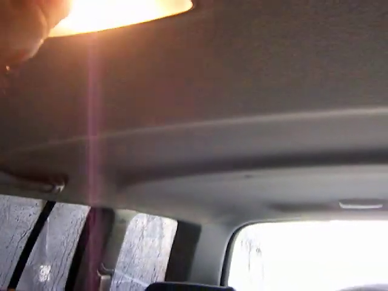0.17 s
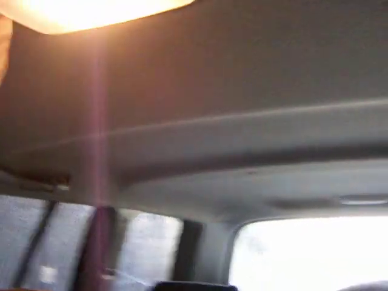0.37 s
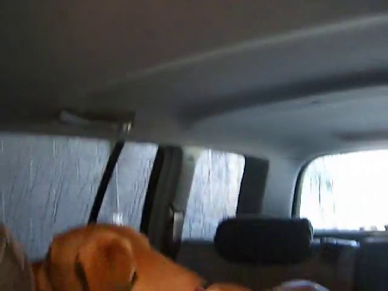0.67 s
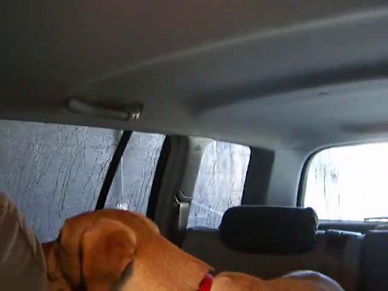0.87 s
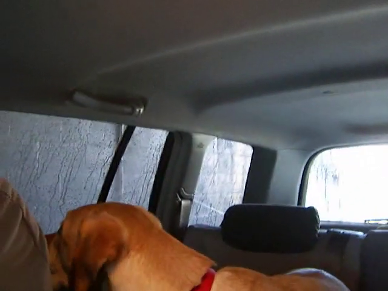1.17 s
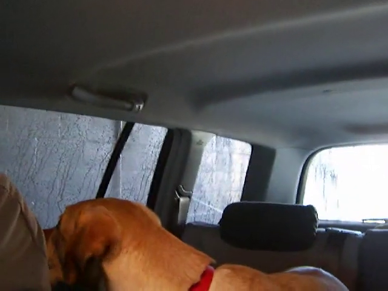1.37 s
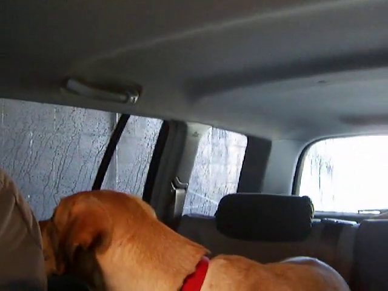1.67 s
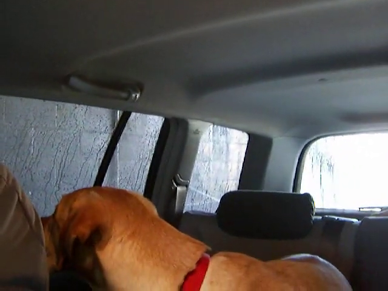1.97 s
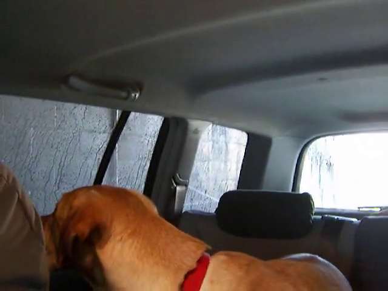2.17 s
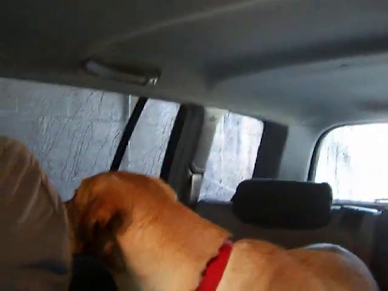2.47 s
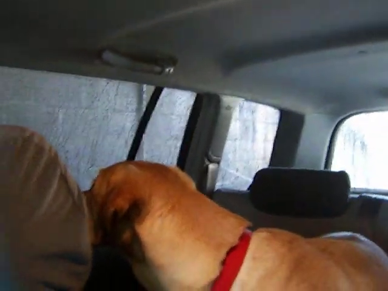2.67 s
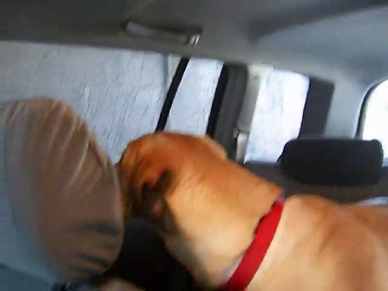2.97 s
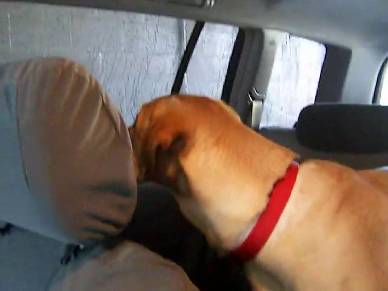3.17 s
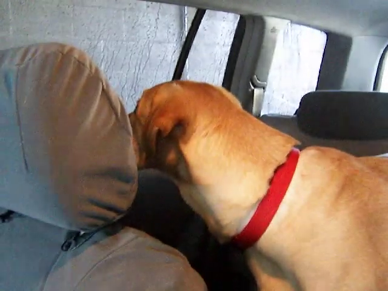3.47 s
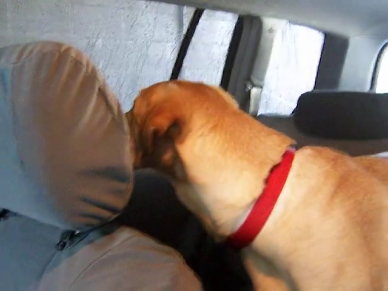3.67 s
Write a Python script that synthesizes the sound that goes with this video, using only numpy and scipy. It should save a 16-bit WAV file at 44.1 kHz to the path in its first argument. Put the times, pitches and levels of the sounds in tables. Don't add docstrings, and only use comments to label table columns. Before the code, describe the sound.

A car wash heard inside a parked car: deep, uneven pump boom near 40 Hz and dull water roar throughout. Plastic taps and creaks begin at once, and a loud lamp switch snap lands at 0.12 s with a brief dry ring. Faint water swells around 1.1 s and, weaker, 3.4 s. A tiny tick at 2.17 s precedes a rising, wavering motor hum with fuzzy whirr. Thin hiss and whine persist.

```python
import sys
import numpy as np
from scipy import signal
from scipy.fft import rfft, irfft
from scipy.io import wavfile
from scipy.ndimage import uniform_filter1d

SR = 44100
rng = np.random.default_rng(int(sys.argv[2]) if len(sys.argv) > 2 else 0)


def materialize(psi):
    bounded = np.clip(np.atleast_2d(psi).T, -1, 1)
    quanta = np.round(bounded * 32767).astype(np.int16)
    wavfile.write(sys.argv[1], SR, quanta)


def voltage_ratio(level):
    return 10 ** (np.asarray(level, float) / 20)


N = 168903
T = np.arange(N) / SR


def evened(x):
    return x / np.sqrt(np.mean(x ** 2) + 1e-20)


def curve(points, axis=1):
    p = np.array(points, float)
    return np.interp(T, p[:, 0], p[:, axis])


def slow(rate_hz):
    z = rfft(rng.standard_normal(4096))
    x = irfft(z * np.exp(-(np.arange(len(z)) / T[-1] / rate_hz) ** 2))
    return evened(np.interp(T, np.linspace(0, T[-1], len(x)), x))


def noise(points, patchy_db, flicker_db, size=2048):
    hop = size // 4
    frames, hz = N // hop + 5, np.fft.rfftfreq(size, 1 / SR)
    real, imag, patches = rng.standard_normal((frames, len(hz), 3)).T
    patches = uniform_filter1d(patches, size=size // 100, axis=0)
    patches = evened(uniform_filter1d(patches, size=8, axis=1))
    flicker = evened(uniform_filter1d(rng.standard_normal(frames), size=4))
    f, db = np.transpose(points)
    colour_db = np.interp(np.log(hz + 1), np.log(f + 1), db, right=-90)[:, None]
    z = (real + 1j * imag) * voltage_ratio(colour_db + patchy_db * patches + flicker_db * flicker)
    return evened(signal.istft(z, nperseg=size, noverlap=size - hop)[1][:N])


def tone(hz, width_hz, waver_db, rate_hz=5):
    turns = np.cumsum(hz + width_hz * slow(rate_hz)) / SR + rng.random()
    return np.sqrt(2) * np.sin(2 * np.pi * turns) * voltage_ratio(waver_db * slow(rate_hz))


def ring(modes, rise_s, damp=1):
    t = T[:9000]
    x = np.zeros(len(t))
    for hz, db, t60 in modes:
        x += voltage_ratio(db - 60 * t / (t60 * damp)) * np.sin(2 * np.pi * (hz * t + rng.random()))
    x = x * (1 - np.exp(-t / rise_s))
    return x / abs(x).max()


def crack(hz, width_hz, t60):
    t = T[:900]
    edges = [max(hz - width_hz / 2, 100), min(hz + width_hz / 2, 12000)]
    band = signal.butter(2, edges, "band", fs=SR, output="sos")
    x = signal.sosfilt(band, rng.standard_normal(len(t)) * voltage_ratio(-60 * t / t60))
    return x / abs(x).max()


def add(mix, s, sound):
    part = mix[round(s * SR):][:len(sound)]
    part += sound[:len(part)]


def bursts(rows):
    x = np.zeros(N)
    for s, db, length, hz in rows:
        t = np.arange(0, length, 1 / SR)
        swell = np.sin(np.pi * t / length) ** 2
        add(x, s - length / 2, voltage_ratio(db) * swell * np.cos(2 * np.pi * hz * (t - length / 2)))
    return x


def load_rise(speed=1):
    begin_s, full_s = 2.2, 2.86
    return np.clip((T - begin_s) / (full_s - begin_s) * speed, 0, 1)


# time_s, pitch_hz, level_db
CABIN_BOOM = [(0.0, 44.2, -47), (0.05, 44.15, -32), (0.53, 44.04, -38.5), (0.65, 43.53, -62.5),
              (0.77, 43.76, -34.5), (1.78, 43.7, -36), (1.89, 43.6, -40), (1.95, 41.84, -39.5),
              (2.05, 41.1, -28.5), (2.18, 37.54, -45), (2.39, 39.25, -29.5), (2.46, 40.37, -45),
              (2.61, 39.66, -34), (2.93, 42.4, -33.5), (2.99, 40.76, -35), (3.58, 38.5, -38),
              (3.68, 37.4, -31), (3.83, 39.4, -42.5)]
# pitch_hz, width_hz, level_db, gain_under_load_db
PUMP_HUMS = [(21.7, 2.04, -43, 1), (61, 4.1, -48.5, -0.5), (84, 6.1, -53.5, 1), (120.1, 9.9, -55, 2),
             (169, 0.48, -53.5, 4.5), (239.8, 2, -59.5, -7.5), (258.7, 1.08, -60, 5),
             (287.6, 5.03, -59.5, 0), (339, 0.84, -63.5, 6.5), (414, 6, -63.5, -2.2),
             (449.3, 3.005, -65, 0.5)]


def pump():
    hz, load = curve(CABIN_BOOM), load_rise()
    boom_level = voltage_ratio(curve(CABIN_BOOM, axis=2) - 2)
    x = boom_level * tone(hz, 0.062 * hz, waver_db=3.5, rate_hz=9.8)
    for hum_hz, width_hz, db, load_db in PUMP_HUMS:
        x = x + voltage_ratio(db + load_db * load) * tone(hum_hz, width_hz, waver_db=2.0)
    return x


# time_s, pitch_hz, level_db
MOTOR_LINE = [(0, 372.8, -62.5), (2.05, 371.6, -62.5), (2.16, 374, -55.5), (2.24, 375, -60),
              (2.31, 374.5, -50), (2.4, 371, -55), (2.48, 372.4, -47), (2.58, 372.5, -50),
              (2.68, 372, -50.5), (2.82, 369.5, -47), (3.0, 368.2, -46), (3.07, 366, -53),
              (3.2, 364.6, -56.5), (3.42, 367, -52.5), (3.52, 369, -49), (3.64, 369, -47.5),
              (3.74, 362, -56), (3.83, 365, -44)]
# pitch_multiple, width_hz, level_db (against the main line)
MOTOR_PARTIALS = [(1, 1.06, 0.5), (1.929, 8.08, -20), (2.259, 2.6, -28.5), (3.03, 12, -27),
                  (3.169, 22, -29.5)]


def motor():
    hz = curve(MOTOR_LINE)
    lines = np.zeros(N)
    for multiple, width_hz, db in MOTOR_PARTIALS:
        lines += voltage_ratio(db) * tone(multiple * hz, width_hz, waver_db=1.6, rate_hz=11.9)
    return voltage_ratio(curve(MOTOR_LINE, axis=2)) * lines


# pitch_hz, level_db (per Hz)
WHIRR_COLOUR = [(1080, -39.5), (1135, -8.5), (1170, -0.5), (1205, -8.5), (1270, -40)]


def whirr():
    return voltage_ratio(-67.5) * load_rise(speed=2) * noise(WHIRR_COLOUR, patchy_db=0.5, flicker_db=2.0)


# time_s, level_db
FINGER_SLIDE = [
    (.070, -65),
    (.080, -44),
    (.092, -46),
    (.105, -44.5),
    (.118, -35.5),
    (.123, -51),
    (.127, -76.5),
]
# pitch_hz, level_db (per Hz)
FINGER_COLOUR = [(200, -3.5), (900, 4), (1650, -13.5), (1900, -2.5), (2200, -17), (4500, -26),
                 (6200, -13.5), (7500, -21)]
# centre_s, level_db, length_s, pitch_hz
PLASTIC_CREAKS = [(.0045, -39, 0.0049, 5020), (.0045, -37.5, 0.0029, 3670), (.0060, -36, 0.0025, 2750),
                  (.0788, -39, 0.0074, 1910), (.0835, -48, .006, 5900), (.0860, -44, 0.0036, 2180),
                  (.0888, -45, .005, 3400), (.0888, -44, .004, 6450), (.0895, -49, .004, 5000),
                  (.0920, -47, 0.0034, 3920), (.1075, -43, .005, 1860), (.1130, -39, 0.0087, 1910),
                  (.1130, -50, 0.0042, 5800), (.1190, -40, .004, 6350), (.1215, -37, 0.0042, 4900),
                  (.1320, -39, 0.0036, 6400)]


def finger():
    rub = voltage_ratio(curve(FINGER_SLIDE)) * noise(FINGER_COLOUR, patchy_db=1.0, flicker_db=6.0, size=256)
    return rub + bursts(PLASTIC_CREAKS)


# pitch_hz, level_db, ring_time_s (to fall 60 dB)
COVER_MODES = [(705, -5, .025), (920, -7, 0.011), (1130, 0.5, 0.011), (1330, -4, 0.019), (1490, -4, 0.014),
               (1754, -7, 0.019), (1887, -15, 0.11), (2180, -4.5, 0.016), (2530, -7, 0.014),
               (3140, -13, 0.0063), (3620, -14, .008), (4100, -15, 0.008), (5080, -18, 0.0087),
               (5600, -16, .01)]
# pitch_hz, level_db, ring_time_s (to fall 60 dB)
LINING_MODES = [(122, -6.5, 0.16), (164, -3, 0.038), (203, -8.5, 0.039), (281.6, 3, 0.04),
                (346, -10, 0.039), (427, -4, 0.048), (468, -3.5, 0.055), (571, -7.5, 0.06),
                (647, -4, 0.037)]
# start_s, cover_level_db, lining_level_db, crack_level_db
SWITCH_BLOWS = [(.0038, -28, -41, -39), (.0052, -34, -44, -37), (.0066, -30.5, -41, -44),
                (.0110, -36, -37, -39), (0.017, -36, -30.5, -60), (0.078, -39, -41, -57),
                (.0880, -26.5, -22, -41), (0.0899, -36, -27.5, -53), (.0990, -32.5, -36.5, -58),
                (.1060, -40, -33, -56), (0.121, -36, -25.5, -23), (0.1228, -39, -36, -27),
                (0.1266, -28, -30.5, -32), (0.1284, -25, -27.5, -36), (0.1291, -26, -24, -47),
                (0.1310, -26, -29.5, -38), (0.1361, -27.5, -44, -48), (.1400, -38, -29, -58),
                (0.146, -39.5, -51, -61)]


def blows():
    x = np.zeros(N)
    for s, cover_db, lining_db, crack_db in SWITCH_BLOWS:
        add(x, s, voltage_ratio(cover_db) * ring(COVER_MODES, rise_s=0.00015, damp=0.88))
        add(x, s, voltage_ratio(lining_db) * ring(LINING_MODES, rise_s=0.0019))
        add(x, s, voltage_ratio(crack_db) * crack(hz=4880, width_hz=4900, t60=0.018))
    return x


# centre_s, level_db, length_s, pitch_hz
SPRING_SNAP = [
    (.1244, -12.5, .0016, 3100),
    (.1251, -11, .0018, 1850),
    (.1254, -14, .0026, 1050),
    (.1257, -20, .0014, 2700),
    (.1245, -21, .0016, 5550),
    (.1243, -23, .0014, 7300),
    (.1258, -27, .0016, 5000),
    (.1242, -25, .0012, 8600),
    (.1246, -24, .0012, 4100),
]
# centre_s, level_db, length_s, pitch_hz
COVER_PATCHES = [(.0090, -35.5, 0.017, 575), (.0070, -38.5, 0.0061, 1740), (.0090, -36, .010, 1200),
                 (.0915, -30.5, 0.012, 1350), (.0960, -29, 0.02, 432), (.0950, -34.5, 0.027, 287),
                 (.0930, -32, .010, 840), (.1330, -33, 0.013, 1220), (0.12, -32, 0.0045, 1640),
                 (.1420, -37, 0.0086, 940), (0.152, -52, .05, 1900)]


def switch():
    x = finger() + blows() + bursts(SPRING_SNAP) + bursts(COVER_PATCHES)
    t = T[:6000]
    tail = rng.standard_normal(len(t)) * voltage_ratio(-60 * t / 0.039) * (t > .002)
    tail = signal.lfilter([1], [1, -.6], tail)
    return x + voltage_ratio(-14.5) * signal.oaconvolve(x, tail / np.linalg.norm(tail))[:N]


# pitch_hz, level_db (per Hz)
ROAR_COLOUR = [(8.8, -26.5), (15, 6.5), (32, -2.5), (54, -5.5), (92, -7.5), (354, -20.5), (540, -25.5),
               (1500, -39), (1950, -68.5), (3300, -120)]
# pitch_hz, level_db (per Hz)
SPRAY_COLOUR = [(700, -18.5), (1200, -15), (2000, 0.5), (2700, -1), (3300, -1), (3900, -4), (5000, -10.5),
                (7000, -25)]
# time_s, level_db
SPRAY_LEVEL = [(0, -58), (.9, -60), (1.15, -60), (1.6, -59.5), (2.1, -63.5), (2.6, -67), (3.3, -66.5),
               (3.83, -61.5)]


def water():
    roar = voltage_ratio(-38) * noise(ROAR_COLOUR, patchy_db=1.24, flicker_db=0.5, size=4096)
    spray = noise(SPRAY_COLOUR, patchy_db=0.0, flicker_db=-1.3, size=1024)
    return roar + voltage_ratio(curve(SPRAY_LEVEL)) * spray


# centre_s, length_s, level_db
WATER_SHEETS = [
    (1.09, 0.42, -59),
    (3.448, 0.49, -68),
]
# pitch_hz, level_db (per Hz)
WATER_SHEET_COLOUR = [(400, -6), (600, -5), (900, -10), (1150, -2.5), (1350, -3), (1600, -8), (2200, -24)]


def sheets():
    swell = np.zeros(N)
    for s, length, db in WATER_SHEETS:
        swell += voltage_ratio(db) * np.cos(np.pi * np.clip((T - s) / length, -.5, .5)) ** 2
    return swell * noise(WATER_SHEET_COLOUR, patchy_db=0.5, flicker_db=1.5, size=1024)


# centre_s, level_db, length_s, pitch_hz
HOUSING_TICK = [
    (2.1737, -38, .0009, 5200),
    (2.1741, -43, .0012, 6000),
    (2.1738, -41, .0012, 8000),
]
# pitch_hz, level_db (per Hz)
HISS_COLOUR = [(590, -32), (1000, -5), (1650, -4), (4000, -8.5), (6500, -8.5), (7300, -9), (9200, -9)]


def camera():
    whine_level = voltage_ratio(-63 + .4 * slow(rate_hz=4))
    whine = whine_level * np.sqrt(2) * np.sin(2 * np.pi * 6903.2 * T)
    hiss = voltage_ratio(-58) * noise(HISS_COLOUR, patchy_db=0.4, flicker_db=0.0, size=1024)
    return whine + bursts(HOUSING_TICK) + hiss


def scene():
    return (pump() + motor() + whirr() + switch() + water() + sheets() + camera())[None]


def top_cut(x):
    return signal.sosfilt(signal.butter(12, 9100, fs=SR, output="sos"), x)


# pitch_hz, level_db
TREBLE_ROLL_OFF = [(0, -0.5), (7300, 0), (7900, -7.5), (8500, -17.5), (8900, -28), (9150, -59.5),
                   (9500, -110), (22050, -130)]


def record(dry):
    bins, z = np.fft.rfftfreq(N, 1 / SR), rfft(dry)
    high = 1 / (1 + np.exp(-(bins - 7900) / 150))
    flutter = voltage_ratio(2.5 * slow(rate_hz=90))
    x = irfft(z * (1 - high), N) + irfft(z * high, N) * flutter
    hz, db = np.transpose(TREBLE_ROLL_OFF)
    x = irfft(rfft(x) * voltage_ratio(np.interp(bins, hz, db)), N)
    return top_cut(x)


dry = scene()
out = record(dry)
materialize(out)
```